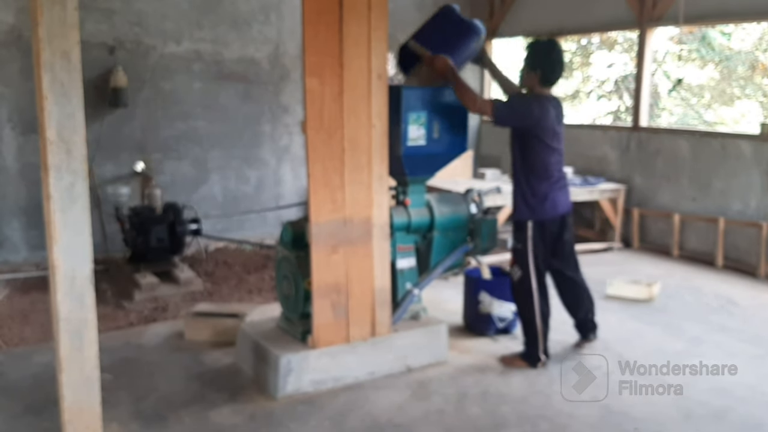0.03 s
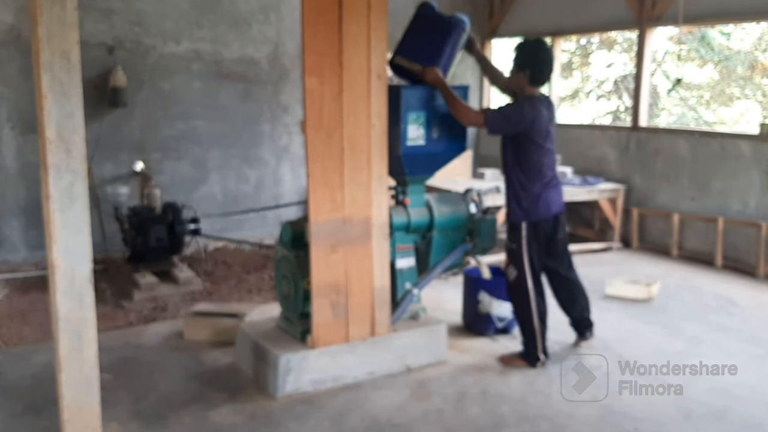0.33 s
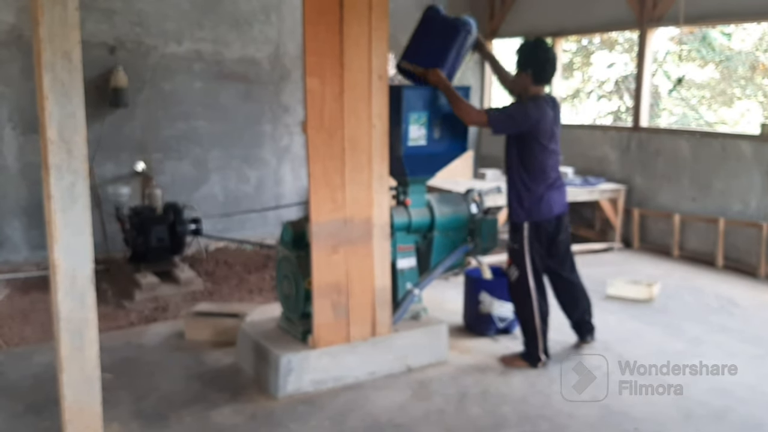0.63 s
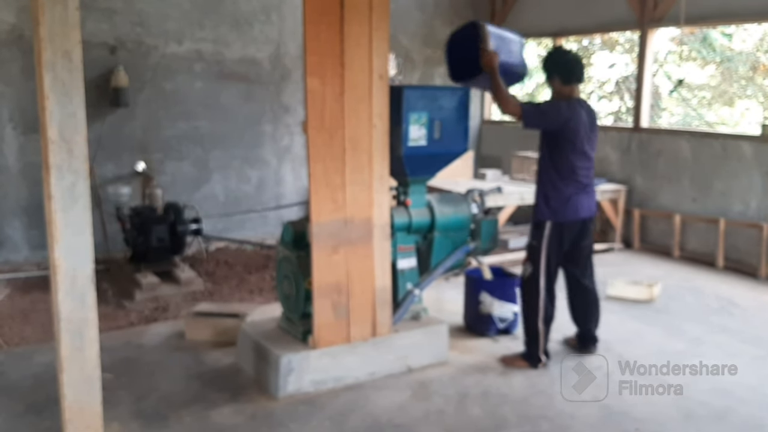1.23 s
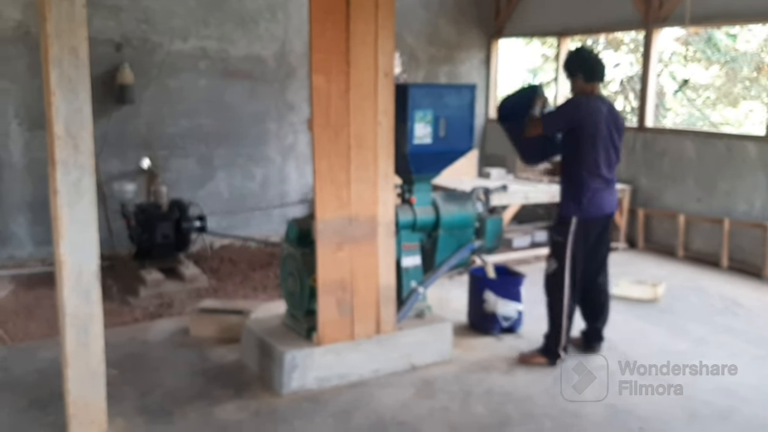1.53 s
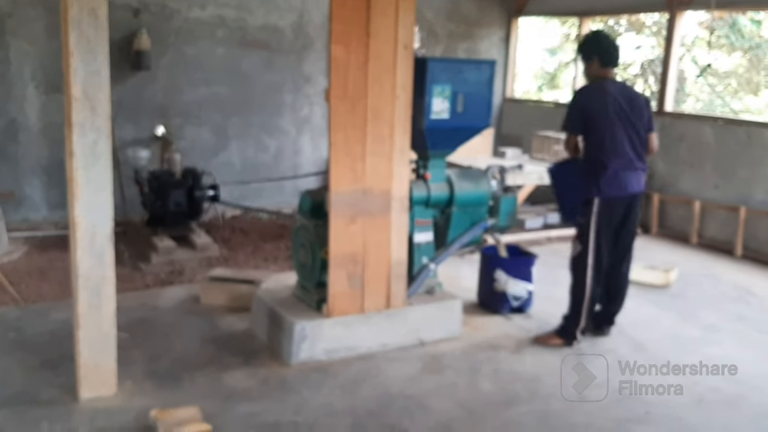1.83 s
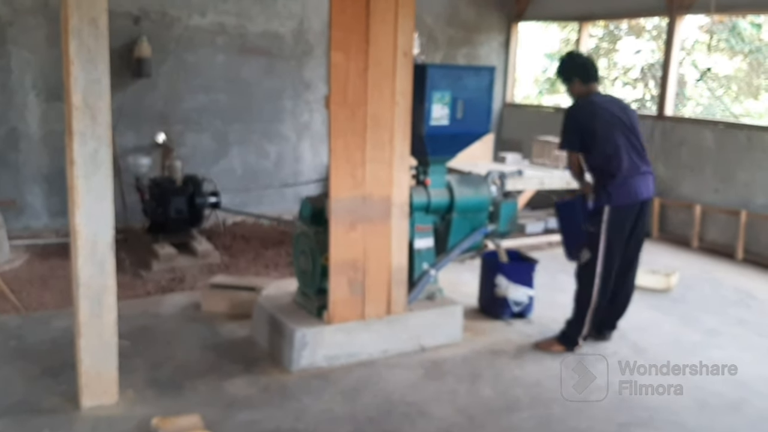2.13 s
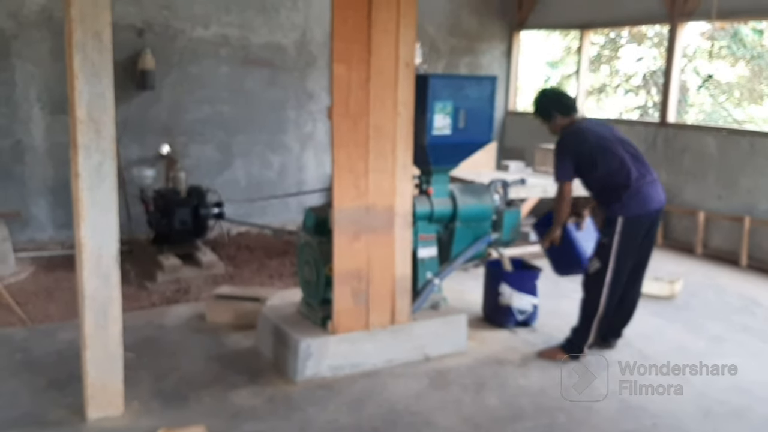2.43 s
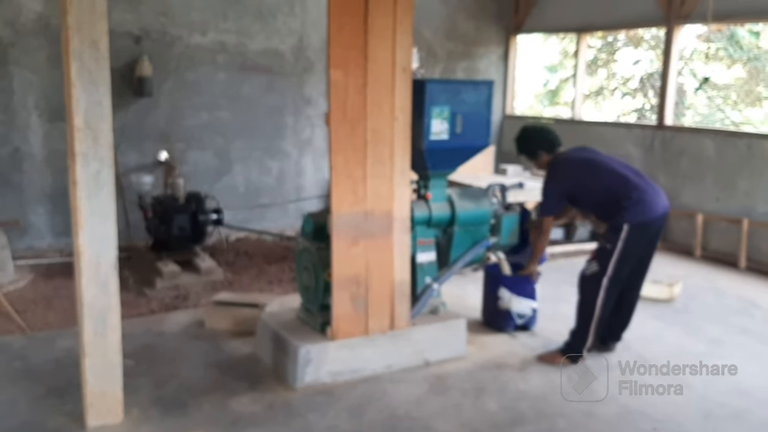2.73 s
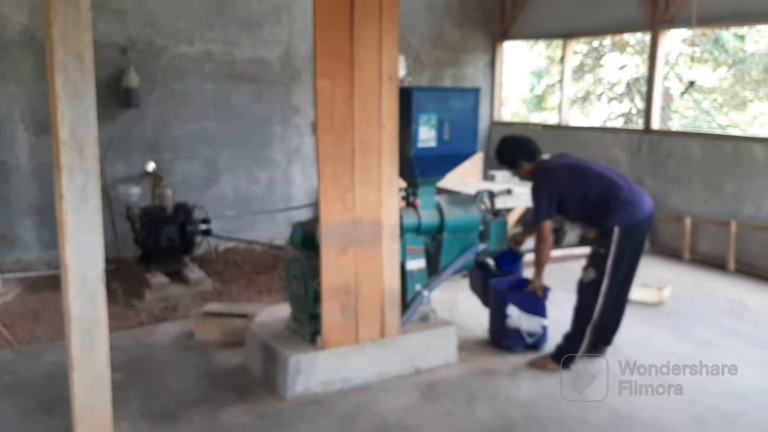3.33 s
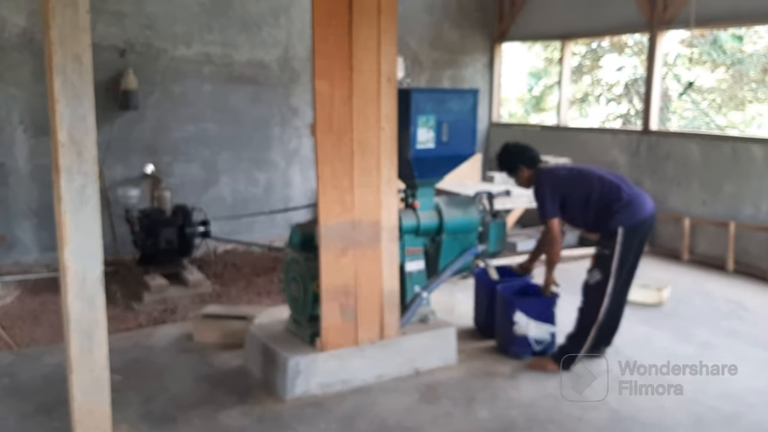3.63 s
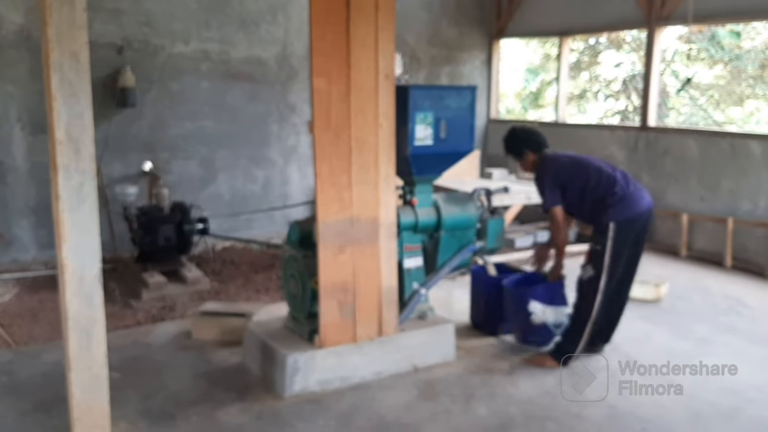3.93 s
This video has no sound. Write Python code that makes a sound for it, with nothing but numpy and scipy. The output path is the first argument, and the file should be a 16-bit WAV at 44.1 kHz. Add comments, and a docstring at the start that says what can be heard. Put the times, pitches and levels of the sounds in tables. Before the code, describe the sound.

A diesel-driven rice mill runs with fast, even knocking, metal clatter and a wavering whine.

```python
"""A bare concrete workshop, heard on a stereo pair: a slow single-cylinder diesel drives a rice mill
by belt. Every engine cycle brings a chug of exhaust thumps and their returns from the walls, a knock
ringing in the block and valve gear, and a swell of clatter; now and then loose metal clanks.
The mill drones, its rotor whines and rubbed grain hisses through it.
Near the end, rice starts to drum into an empty plastic bucket."""
import sys
import numpy as np
from scipy import signal
from scipy.fft import rfft, irfft
from scipy.io import wavfile

SR = 44100
rng = np.random.default_rng(int(sys.argv[2]) if len(sys.argv) > 2 else 0)


def transcribe(signal):
    """Save signal, clipped to [-1, 1], as a 16-bit WAV file at the path in sys.argv[1]."""
    frames = np.atleast_2d(signal).T
    limited = np.clip(frames, -1, 1)
    pcm = np.round(limited * 32767).astype(np.int16)
    wavfile.write(sys.argv[1], SR, pcm)


N = 176400

# Engine speed. Each row: time in seconds, firings per second.
FIRING_RATE = [(0.0, 10.54), (0.6, 10.562), (0.9, 10.501), (1.35, 10.535), (1.75, 10.493), (2.25, 10.445),
               (2.55, 10.503), (2.95, 10.465), (3.25, 10.502), (3.6, 10.436), (4.0, 10.483)]
# The exhaust's tone. Each row: multiple of the firing rate, relative level in dB.
EXHAUST_HARMONICS = [(5, -72), (7, -75), (8, -54.5), (10, -65), (11, -51.5), (12, -43), (13, -41.5),
                     (14, -77), (15, -42.5), (16, -38.5), (17, -43.5), (18, -37), (19, -40.5), (20, -47.5),
                     (22, -34.5), (23, -39), (24, -46.5), (25, -55), (26, -40.5), (27, -37.5), (28, -37.5),
                     (29, -39.5), (30, -35.5), (32, -62), (33, -45), (35, -44.5), (36, -44.5), (37, -42),
                     (38, -48.5)]
# The thump and its returns from the walls.
# Each row: place in the cycle from 0 to 1, centre in Hz, width in Hz, weight in dB.
EXHAUST_THUMPS = [(0.814, 190, 42, 6.0), (0.102, 214, 51, 1.6), (0.21, 350, 10, 4.1),
                  (0.286, 162, 32, -7.6), (0.473, 318, 21, -0.4), (0.526, 200, 38, 2.8)]
# Colour of the engine's rattle. Each row: frequency in Hz, relative density in dB.
CLATTER_SPECTRUM = [(300, -26), (550, -11), (680, -8.5), (800, -6), (900, 0), (1150, 2.5), (1400, 0.5),
                    (1950, -2.5), (2230, 1), (2600, -3.5), (3700, -3.5), (4350, -4.5), (5300, -8.5),
                    (6300, -17), (8000, -27), (16000, -27)]
# The clatter's swell over one cycle. Each row: place from 0 to 1, gain in dB.
CLATTER_SWELL = [(.05, -1), (.2, -1.5), (.37, -3.5), (.43, 0), (.62, 2), (.74, 0.95), (.87, 0.5)]
# The dense rattle before its swell. Each row: time in seconds, level in dB.
RATTLE_LEVEL = [(0, -19.5), (1.3, -19.3), (1.9, -21), (3, -21), (4, -21.5)]
# Sharp ticks in the clatter. Each row: frequency in Hz, relative density in dB.
TICK_SPECTRUM = [(1000, -14.5), (2500, -8), (4300, -1.5), (5400, -5.5), (6500, -16.5), (8000, -24),
                 (16000, -36)]
# Ringing metal parts. Each row: frequency in Hz, width in Hz, relative level in dB.
METAL_MODES = [(1610, 33, 0), (1786, 24, -11), (2228, 44, 4.5), (2480, 43, -12), (4330, 57, 0.5)]
# The rotor's whine. Each row: time in seconds, pitch in Hz, relative level in dB.
ROTOR_TONE = [(0.0, 715.2, -26), (0.2, 718.2, -33.5), (0.33, 721, -24), (0.53, 725, -29.5),
              (2.16, 726, -30.5), (2.19, 730.6, -20.5), (2.25, 717.6, -28), (3.12, 718.5, -32),
              (3.25, 722, -26), (3.41, 718, -33.5), (3.55, 718, -26), (4.0, 723, -29)]
# The mill's running noise in the room. Each row: frequency in Hz, relative density in dB.
DRONE_SPECTRUM = [(25, -50), (60, -33), (100, -11), (140, -10.5), (280, -3), (335, -6), (385, -10),
                  (450, -7), (600, -5.5), (680, 5), (750, 10), (815, 7.5), (880, 3), (1000, -0.5),
                  (1300, -10.5), (3000, -8.5), (7000, -32.5), (16000, -46)]
# Colour of the grain's hiss. Each row: frequency in Hz, relative density in dB.
GRAIN_SPECTRUM = [(2000, -0.5), (4500, -2), (6500, -8), (8200, -7), (9500, -1), (11000, 3.5), (12300, 1.5),
                  (14000, 0), (16000, -3.5)]
# The hiss before its swell and flicker. Each row: time in seconds, level in dB.
GRAIN_LEVEL = [(0, -39.5), (.24, -35.5), (.35, -37.5), (1.45, -39), (2, -38), (3.2, -39.5), (4, -38.5)]
# Valve gear ringing around each knock. Each row: delay in seconds, frequency in Hz,
# decay in seconds, level in dB, lead at the left microphone in ms.
VALVE_RINGS = [(-.024, 2230, 0.0079, -22.5, 0), (-.023, 2480, 0.013, -26, .2),
               (-.023, 3170, 0.0072, -19, .15), (-.022, 4373, .02, -31, 0),
               (-.022, 5600, 0.012, -31, 0.037), (-.008, 2370, 0.0042, -35, 0.18),
               (-.008, 4896, .011, -28, .02), (-.006, 4290, 0.0074, -31, 0.014),
               (-.005, 2423, 0.011, -25, 0.14)]
# Combustion knocks. Each row: time in seconds, gain in dB.
FIRINGS = [(0.0611, 1.5), (0.1561, 1.2), (0.251, 1.0), (0.3457, 0.9), (0.4409, 1.7), (0.5354, 0.9),
           (0.6303, 0.5), (0.725, 0.9), (0.8196, 1.9), (0.9147, 1.0), (1.01, 0.5), (1.1056, -0.6),
           (1.2005, 0.6), (1.2957, -2.2), (1.3903, -1.0), (1.4855, 1.9), (1.5802, -0.9), (1.6755, -0.6),
           (1.771, -1.4), (1.8666, 1.5), (1.962, 0.5), (2.0573, -1.2), (2.1527, -0.4), (2.2485, -2.8),
           (2.3442, -0.7), (2.4401, -0.8), (2.5352, 1.7), (2.6306, 0.8), (2.7255, -2.4), (2.8208, 0.8),
           (2.9164, -0.4), (3.0122, -2.2), (3.1076, -1.6), (3.203, -0.7), (3.2982, 0.8), (3.3936, 0.5),
           (3.4889, 1.1), (3.5846, -3.2), (3.6807, -1.0), (3.7764, -0.8), (3.8717, 0.4), (3.9672, 0)]
# The block's pings in each knock. Each row: delay in seconds, frequency in Hz, half-width in seconds,
# relative level in dB, left minus right in dB, lead at the left microphone in ms.
BLOCK_PINGS = [(-.018, 926, 0.0047, -22.5, 1, -0.0018), (-.006, 813, 0.0095, -24, -2, -.14),
               (-.006, 1054, 0.018, -24, -1, 0.54), (-.004, 977, .013, -25, -10, -.16),
               (-.004, 1120, 0.0033, -17.5, 4, 0.3), (0, 878.4, 0.0088, -16.5, 2.5, 0.079),
               (.008, 1156, 0.0071, -27.5, -6.5, -0.28), (0.023, 853.5, 0.017, -26.5, -10.5, -0.44),
               (0.032, 813, 0.007, -30, 6, -.02), (0.045, 990, 0.013, -26, 1, .38),
               (0.051, 852, 0.0043, -22.5, 0, -0.22)]
# Harder strikes of loose metal. Each row: start in seconds, level in dB.
CLANK_STRIKES = [(.714, -22), (1.666, -25), (2.333, -27), (3.671, -20)]
# The bucket's resonances. Each row: frequency in Hz, width in Hz, gain in dB.
BUCKET_MODES = [(320, 30, -12), (380, 65, -7), (567, 86, -8.5)]
# How alike the room sounds at the two microphones. Each row: frequency in Hz, likeness from -1 to 1.
ROOM_LIKENESS = [(60, 0.94), (270, 1), (450, 0.6), (740, 0.68), (880, 0.45), (1080, 0.056), (1300, -0.35),
                 (2000, 0.18), (3300, -0.12), (5500, 0.12), (9000, -0.053), (15000, -0.048)]
# Balance of the microphones. Each row: frequency in Hz, left minus right in dB.
MIC_BALANCE = [(100, 0), (160, 2.5), (270, -2), (500, 2), (950, 0.9), (1900, -0.1), (3800, -1.2),
               (7500, 1.5), (15000, 1.5)]


def amp(db):
    """Decibels to gain."""
    return 10 ** (np.asarray(db) / 20)


def unit_rms(x):
    """Scales to rms 1."""
    return x / np.sqrt(np.mean(abs(x) ** 2) + 1e-20)


def over_frequency(points, hz):
    """Reads a table on a log-frequency axis."""
    f, value = np.transpose(points)
    return np.interp(np.log(hz + 1), np.log(f + 1), value)


def over_time(points):
    """Reads a table over time, at every sample."""
    return np.interp(np.arange(N) / SR, *np.transpose(points))


def wander(rate_hz):
    """Smooth random drift of rms 1."""
    hz = np.fft.rfftfreq(N, 1 / SR)
    return unit_rms(irfft(rfft(rng.standard_normal(N)) * np.exp(-.5 * (hz / rate_hz) ** 2), N))


def in_room(pair, spectrum=None, direct=0):
    """Blends two unrelated signals as the room does; any direct noise reaches the left mic first."""
    size, left_lead_s = pair.shape[1], .00016
    hz = np.fft.rfftfreq(size, 1 / SR)
    likeness = np.clip(over_frequency(ROOM_LIKENESS, hz), -.99, .99)
    mid, side = rfft(pair) * np.sqrt([1 + likeness, 1 - likeness])
    direct_left = direct * rfft(rng.standard_normal(size))
    direct_right = direct_left * np.exp(-2j * np.pi * hz * left_lead_s)
    mics = np.array([mid + side + direct_left, mid - side + direct_right])
    colour = 1 if spectrum is None else amp(over_frequency(spectrum, hz))
    return unit_rms(irfft(mics * colour, size))


def ring(drive, modes):
    """Passes a drive through the resonances of a body."""
    return sum(amp(db) * signal.lfilter(*signal.iirpeak(hz, hz / width, SR), drive)
               for hz, width, db in modes)


def impacts(per_s, spread_db):
    """Random small impacts of uneven size."""
    size = amp(spread_db * np.minimum(rng.exponential(1, (2, N)), 4))
    return size * rng.choice([-1, 1], (2, N)) * (rng.random((2, N)) < per_s / SR)


def exhaust(cycles):
    """Harmonics of the firing rate, phased to bunch into each cycle's thumps, near the centre."""
    gain_db, side_db, waver = -2.5, -18, .19
    mid, side = np.zeros(N), np.zeros(N)
    for order, db in EXHAUST_HARMONICS:
        hz = order * cycles[-1] * SR / N
        arrival = sum(amp(weight) * np.exp(-.5 * ((hz - centre) / width) ** 2 - 2j * np.pi * order * at)
                      for at, centre, width, weight in EXHAUST_THUMPS)
        phase = 2 * np.pi * order * cycles + np.angle(arrival)
        drift = np.interp(cycles, np.arange(50), rng.standard_normal(50))  # a new strength each cycle
        mid += amp(db) * (1 + waver * drift) * np.cos(phase)
        side += amp(db) * np.cos(phase + 2 * np.pi * rng.random())
    return np.sqrt(2) * amp(gain_db) * (mid + amp(side_db) * np.array([side, -side]))


def engine_clatter(swell_db):
    """Valve gear and loose metal rattle, tick and ring, swelling once a cycle."""
    ticks_db, metal_db, rattle_flicker_db, metal_flicker_db = -34, -33.5, .4, 4
    rattle = in_room(rng.standard_normal((2, N)), CLATTER_SPECTRUM, direct=.53)
    rattle *= amp(over_time(RATTLE_LEVEL) + rattle_flicker_db * wander(rate_hz=13))
    ticks = in_room(impacts(per_s=600, spread_db=4.5), TICK_SPECTRUM)
    metal = sum(ring(rng.standard_normal((2, N)), [mode]) * amp(metal_flicker_db * wander(rate_hz=6.7))
                for mode in METAL_MODES)
    return (rattle + amp(ticks_db) * ticks + amp(metal_db) * unit_rms(metal)) * amp(swell_db)


def rotor_whine(cycles):
    """The mill rotor's tone wavers, and throbs with its shaft and with the engine."""
    gain_db, shaft_hz, throb_place = 4.5, 23.5, .99
    track = np.array(ROTOR_TONE)
    pitch_hz, level_db = over_time(track[:, [0, 1]]), over_time(track[:, [0, 2]])
    tone = np.exp(2j * np.pi * np.cumsum(pitch_hz) / SR)
    engine_throb = 1 + .17 * np.cos(2 * np.pi * (cycles - throb_place))
    shaft_throb = 1 + .24 * np.cos(2 * np.pi * shaft_hz * np.arange(N) / SR)
    # Both strength and phase waver.
    wavers = [.27 * (wander(rate_hz=12) + 1j * wander(rate_hz=12)) for _ in range(2)]
    mid, side = 1 + wavers[0], .15 * wavers[1]
    mics = (np.array([mid + side, mid - side]) * tone).real
    return amp(gain_db + level_db) * unit_rms(mics * engine_throb * shaft_throb)


def mill_drone(level_db=-25.5):
    """The mill's steady running noise fills the room."""
    return amp(level_db) * in_room(rng.standard_normal((2, N)), DRONE_SPECTRUM)


def grain_hiss(swell_db, flicker_db=1.34):
    """Grain rubbed in the mill hisses, partly following the engine's swell."""
    level_db = over_time(GRAIN_LEVEL) + .42 * swell_db + flicker_db * wander(rate_hz=23)
    return amp(level_db) * in_room(rng.standard_normal((2, N)), GRAIN_SPECTRUM)


def valve_gear():
    """Valve gear is struck just ahead of each knock, and rings on."""
    rise_s, detune, scatter_db = .0024, .0039, 3.5
    out, t = np.zeros((2, N)), np.arange(SR // 10) / SR
    attack = np.minimum(t / rise_s, 1)
    for start, _ in FIRINGS:
        for delay, hz, decay, db, lead_ms in VALVE_RINGS:
            size, mistune, phase = rng.standard_normal(3)
            mic_time = t + np.array([[0], [-lead_ms / 1000]])
            tone = np.cos(2 * np.pi * (hz * (1 + detune * mistune) * mic_time + phase))
            add(out, start + delay, amp(db + scatter_db * size) * attack * np.exp(-t / decay) * tone)
    return out


def combustion_knocks():
    """Each firing sets off nearly the same run of pings in the engine block."""
    scatter_db, scatter_rad = 1.2, .3
    out, t = np.zeros((2, N)), np.arange(-SR // 20, SR // 10) / SR
    delay, hz, half_width, ping_db, pan_db, lead_ms = np.transpose(BLOCK_PINGS)[:, :, None]
    mic = np.array([.5, -.5])[:, None, None]  # left, right
    for start, db in FIRINGS:
        turn, size = rng.standard_normal((2, len(BLOCK_PINGS), 1))
        gain = amp(db + ping_db + mic * pan_db + scatter_db * size)
        envelope = np.exp(-.5 * ((t - delay) / half_width) ** 2)
        phase = 2 * np.pi * hz * (t - delay + mic * lead_ms / 1000) + scatter_rad * turn
        add(out, start + t[0], (gain * envelope * np.cos(phase)).sum(1))
    return out


def loose_clanks(decay_s=.0046):
    """Now and then a loose part strikes harder: a short burst in the clatter's colour."""
    out, t = np.zeros((2, N)), np.arange(SR // 20) / SR
    for start, db in CLANK_STRIKES:
        burst = in_room(rng.standard_normal((2, len(t))), CLATTER_SPECTRUM)
        add(out, start, amp(db) * np.exp(-t / decay_s) * burst)
    return out


def rice_into_bucket(cycles, chug):
    """Rice drums on the bottom of the bucket, which then also booms with the engine's chug."""
    start_s, rise_s = 3.51, .025
    drum_db, boom_gain_db, surge_db, surge_place = -30, 11.5, 2, .17
    flow = np.clip((np.arange(N) / SR - start_s) / rise_s, 0, 1)
    surge = np.cos(2 * np.pi * (cycles - surge_place))
    soften = signal.butter(2, [220, 700], "bandpass", fs=SR, output="sos")
    grains = signal.sosfilt(soften, impacts(per_s=2500, spread_db=2.5))
    drumming = amp(drum_db + surge_db * surge) * in_room(ring(grains, BUCKET_MODES))
    boom = amp(boom_gain_db) * ring(chug, BUCKET_MODES)
    return flow * (drumming + boom)


def add(mix, start_s, sound):
    """Mixes a sound in at a time."""
    part = mix[:, max(round(start_s * SR), 0):][:, :sound.shape[1]]
    part += sound[:, :part.shape[1]]


def scene():
    """Engine, mill and bucket as they reach the microphones, pulsing with the engine's cycle."""
    cycles = np.cumsum(over_time(FIRING_RATE)) / SR
    swell_db = np.interp(cycles, *np.transpose(CLATTER_SWELL), period=1)
    chug = exhaust(cycles)
    engine = chug + combustion_knocks() + valve_gear() + loose_clanks() + engine_clatter(swell_db)
    mill = rotor_whine(cycles) + mill_drone() + grain_hiss(swell_db)
    return engine + mill + rice_into_bucket(cycles, chug)


def record(dry):
    """A slightly unequal pair of microphones, with the highest treble cut off."""
    cutoff_hz = 15850
    tilt_db = over_frequency(MIC_BALANCE, np.fft.rfftfreq(N, 1 / SR)) / 2
    heard = irfft(rfft(dry) * amp([tilt_db, -tilt_db]), N)
    lowpass = signal.firwin(1023, cutoff_hz, window=("kaiser", 9), fs=SR)
    return signal.oaconvolve(heard, lowpass[None], "same")


dry = scene()
out = record(dry)
transcribe(out)
```